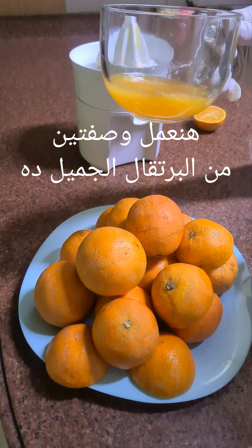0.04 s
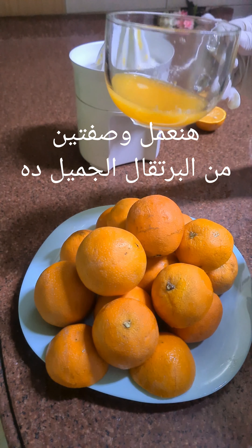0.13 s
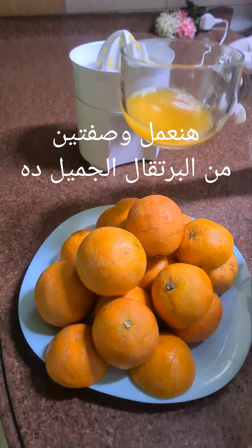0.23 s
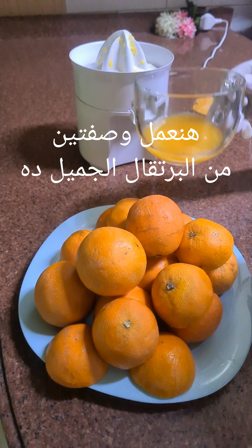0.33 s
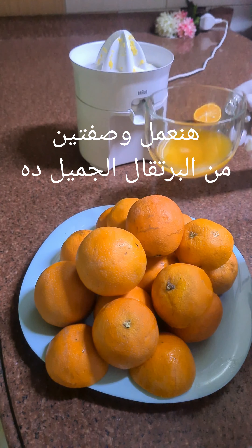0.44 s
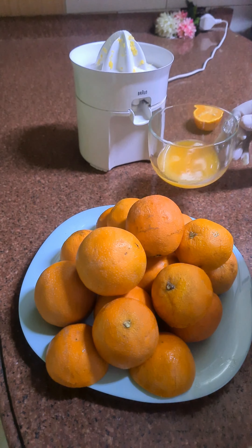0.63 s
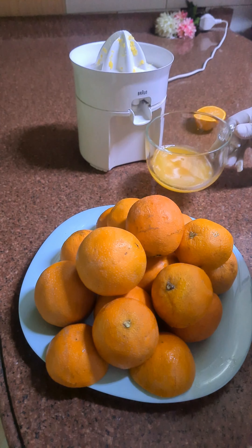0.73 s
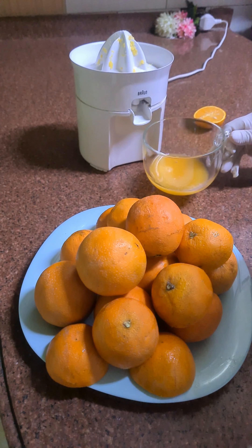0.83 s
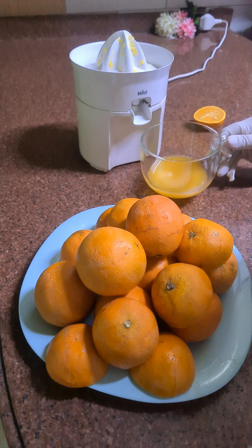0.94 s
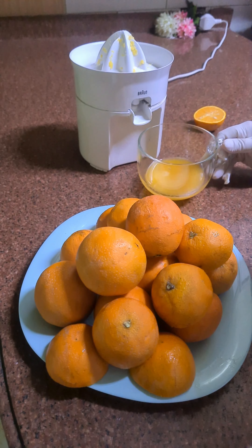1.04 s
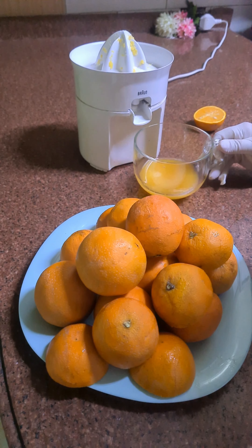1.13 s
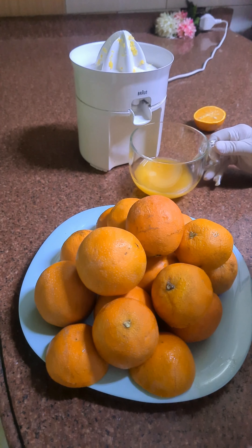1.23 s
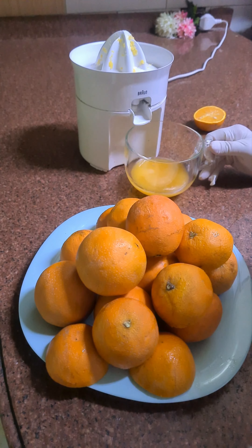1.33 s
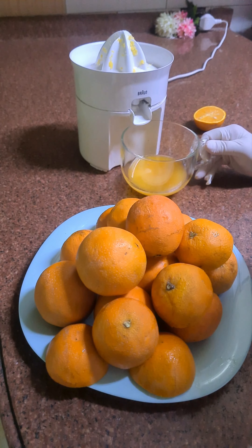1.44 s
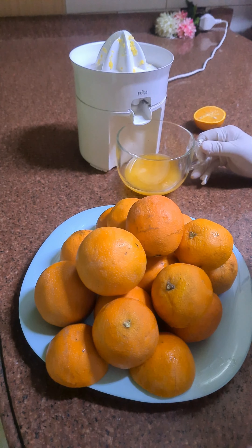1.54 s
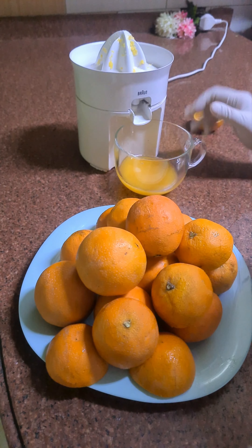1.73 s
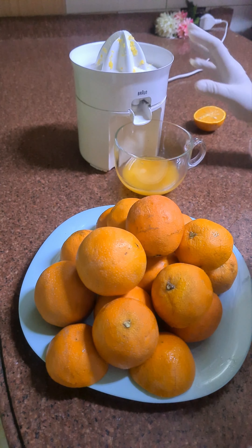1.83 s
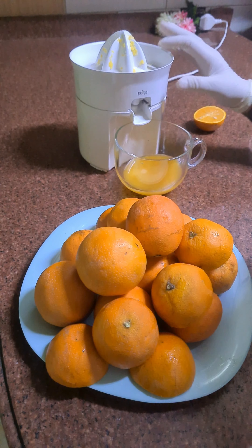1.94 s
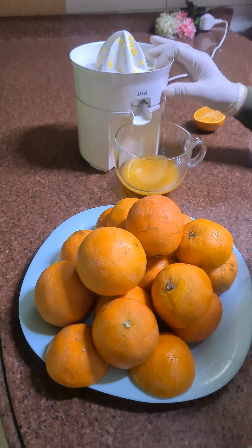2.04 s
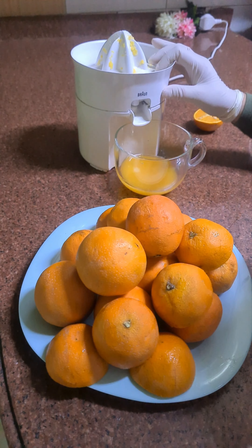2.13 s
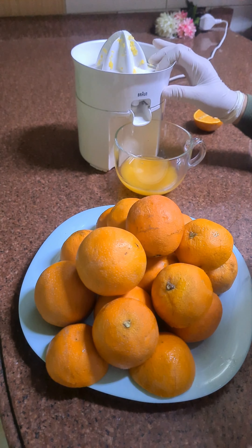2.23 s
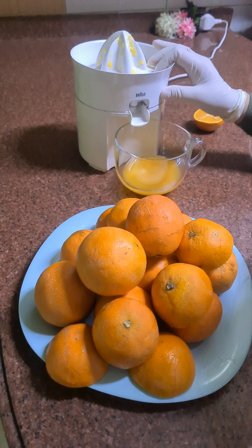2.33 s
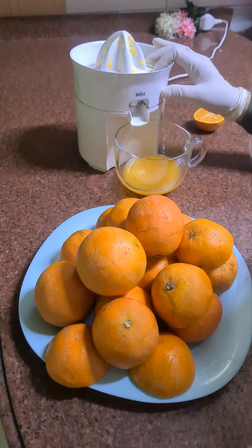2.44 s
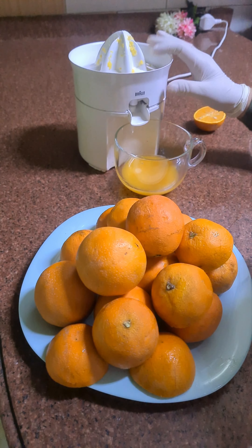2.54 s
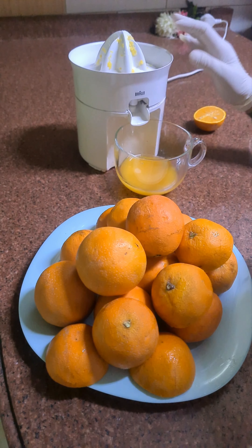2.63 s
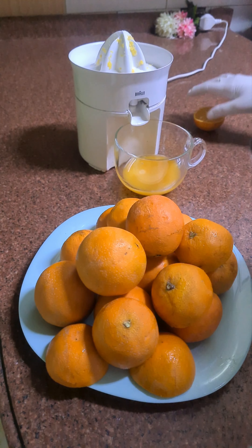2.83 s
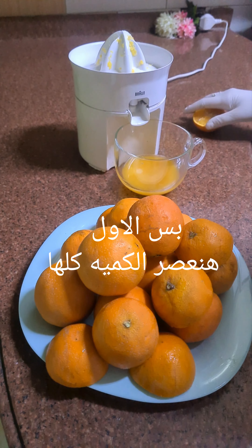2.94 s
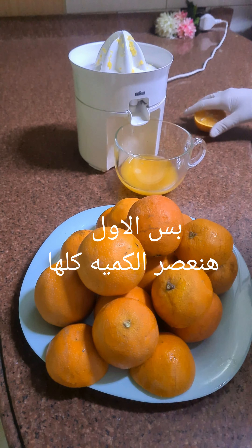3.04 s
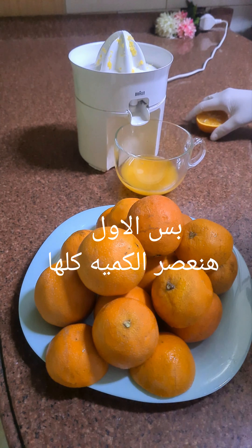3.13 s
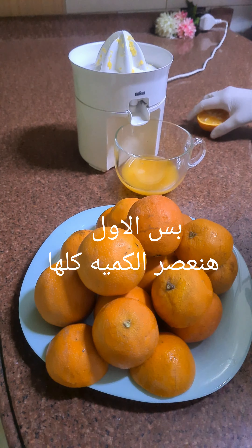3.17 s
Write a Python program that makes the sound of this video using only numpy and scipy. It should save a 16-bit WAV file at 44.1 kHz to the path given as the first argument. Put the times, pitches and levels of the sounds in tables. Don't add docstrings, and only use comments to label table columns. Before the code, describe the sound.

Over low room hum, a heavy glass cup hits the stone counter twice, wobbles and is pushed with a short gritty scrape. A quiet stretch has sparse glove rubs, faint ticks and a couple of hollow plastic knocks. In the last two seconds a small geared motor spins up fast to a steady buzzing whir, then drops slightly and throbs under load, with fine juice crackle. Near stereo phone, short bright room reflections.

```python
import sys
import numpy as np
from scipy import signal
from scipy.fft import rfft, irfft
from scipy.io import wavfile
from scipy.ndimage import uniform_filter1d

SR = 44100
rng = np.random.default_rng(int(sys.argv[2]) if len(sys.argv) > 2 else 0)


def gain_from_db(level_db):
    decades = np.asarray(level_db, float) / 20
    return 10 ** decades


def transcribe(u):
    v = np.clip(np.atleast_2d(u).T, -1, 1)
    q = np.round(v * 32767).astype(np.int16)
    wavfile.write(sys.argv[1], SR, q)


N = 329427
T = np.arange(N) / SR
HZ = np.maximum(np.fft.rfftfreq(N, 1 / SR), 1)

# time_s, mesh_rate_hz
MOTOR_SPEED = [
    (5.27, 255),
    (5.33, 290),
    (5.372, 334),
    (5.46, 335),
    (6.0, 324.8),
    (6.6, 317.5),
    (7.2, 317.2),
    (7.47, 318.2),
]
LINE_ORDERS = [(1, 0), (2, -2), (2, -1), (2, 1), (3, -1), (3, 0), (4, -1), (4, 1), (5, 0), (5, 1), (6, -1),
               (6, 1), (7, 0), (8, 0), (9, 0), (9, 1), (11, 0), (2, 0), (4, 0), (6, 0)]
# free_level_db, loaded_level_db, left_minus_right_db
SIDE_LINES = [(-81, -51.5, 4), (-58, -55, 0), (-54.5, -56, 4), (-51.5, -56.5, 7), (-50.5, -60, -4.5),
              (-43.5, -38, 1.5), (-46.5, -37.5, 5), (-49.5, -43, 4), (-45.5, -47.5, 4), (-46, -56, -6),
              (-45, -74, 4), (-53, -62, -26), (-48, -60, 13.5), (-75, -48, -5), (-51.5, -45, -12),
              (-73.5, -49.5, 7), (-59, -55, -11.5)]
# level_db, mode_hz, width_hz, swell_db, left_minus_right_db
MAIN_LINES = [(-40, 640, 57, 0.5, 2), (-39.5, 1302, 42.5, 11, 0), (-55.5, 1995, 39, 29, -4.5)]
UNSETTLED = [-6.5, -0.5, -15]
PORT_LAG_RAD = [0, -4, 1, 2, 2, 0.9, 1.5, -5.5, 0.5, 4, 1.6, 2]
# mode_hz, width_hz, level_db
HOUSING_MODES = [(650, 16, -3), (927, 87, -3), (1335, 7.2, -7.5), (1690, 18, 3), (1847, 11, -26),
                 (2340, 78, -8), (2720, 21, -22), (2880, 170, -3.5), (3400, 210, -14), (4200, 74, -18),
                 (5430, 67, -12), (6260, 21, -15)]
# frequency_hz, density_db (per Hz)
RATTLE_SPECTRUM = [(59, -63.5), (100, -20), (224, -16), (322, -6.5), (570, -10), (634, -8), (801, -15),
                   (970, -7), (1060, -9.5), (1250, 3.5), (1480, -9), (2860, -11.5), (6560, -19),
                   (7940, -36.5), (16000, -43)]
# start_s, level_db, weight_db (extra thud), hardness_db (extra treble)
BOWL_BLOWS = [
    (1.005, -10, -1.5, -1.5),
    (1.046, -13, -13.5, -2.5),
    (1.137, -22, -0.5, -6.5),
    (1.165, -29.5, 9, -12),
    (1.201, -29.5, 5.5, 0),
    (1.266, -27, 5.5, -12),
    (1.284, -25.5, -13, -19),
    (1.296, -25.5, 4.5, -3.5),
    (1.43, -25.5, 3, 0.5),
    (1.517, -36, 0, -10),
]
# start_s, level_db, weight_db, hardness_db
JUICER_BLOWS = [
    (2.525, -59, 2, -8),
    (4.19, -25.5, 1.5, -1),
    (4.416, -55, 0, 0),
    (4.519, -50, 2.5, 4.5),
    (4.815, -53.5, 1, -14),
    (5.294, -43.5, 1, -10.5),
    (6.449, -31, 0, -4),
]
# start_s, level_db, weight_db, hardness_db
SPOUT_BLOWS = [
    (2.355, -37.5, -1, -3),
    (4.872, -46, -5, -12),
]
# start_s, level_db, crispness_db (extra top)
TICK_BLOWS = [(1.541, -69, -7), (1.644, -59, -23), (1.775, -56, -1), (1.985, -45.5, -4), (3.657, -63, -2),
              (3.68, -57.5, 0), (4.509, -45.5, 3.5), (4.693, -55, -12.5), (4.757, -66.5, 14),
              (5.249, -54, 0), (7.154, -51.5, 15.5), (7.219, -34.5, -10), (7.347, -46.5, 7.5),
              (7.464, -43, -4)]
# low_hz, high_hz
BLOW_BANDS = [(220, 800), (800, 2900), (2900, 7300), (8700, 15800)]
BOWL_BANDS = [-11, -1.5, -31, -43.5]
JUICER_BANDS = [-4, -1, -3.5, -26.5]
SPOUT_BANDS = [1, -1, -12, -46]
TICK_BANDS = [-22, -12, 2.5, -10]
BLOW_TRAITS = [
    [1, 0, 0, 0],
    [0, 0, 1, 1],
]
CRISP_TRAIT = [
    [0, 0, 0, 1],
]
# mode_hz, level_db, t60_s
BOWL_MODES = [(760, -5, .12), (931, -3, .12), (1050, -6, .12), (1184, 1, .25), (1420, -6, .1),
              (1760, 5, .05), (2300, 0, .08), (4613, -4, .08), (6654, 8, .3), (7058, 2, .25),
              (9050, 31, .3), (12600, 8, .2)]
JUICER_MODES = [(565, 2, .14), (700, -5, .12), (829, -2, .19), (1233, -1, .24), (1480, -9, .1),
                (2213, -6, .1), (2650, -3, .12), (3050, -2, .12), (3445, -4, .12)]
SPOUT_MODES = [(330, -1, .1), (548, 0, .15), (1330, -1, .22), (1793, -5, .06), (2670, -2, .24),
               (2826, -5, .16), (4705, 2, .1)]
# frequency_hz, level_db
BLOW_TONE = [(200, -3.5), (600, 0), (1300, 0), (2600, -8.5), (3600, -12), (7000, -29.5), (7700, -40),
             (10000, -34.5), (12000, -26), (16000, -33.5)]
# time_s, level_db
DRAG = [
    (0.98, -82),
    (1.05, -73),
    (1.164, -42.5),
    (1.178, -56),
    (1.338, -50),
    (1.416, -70),
    (1.6, -71),
]
# start_s, length_s, hiss_db, rub_db
STROKES = [(1.645, .01, -72, -72), (1.768, 0.025, -64.5, -87.5), (1.992, 0.0039, -64, -66.5),
           (2.028, .14, -82, -62), (2.61, 0.04, -78, -73.5), (2.707, .015, -67, -81),
           (2.817, 0.085, -72.5, -71), (2.954, 0.25, -70.5, -70.5), (3.32, 0.055, -73, -75),
           (3.402, 0.1, -67, -78), (3.65, .03, -71, -81.5), (3.848, 0.16, -78.5, -80.5),
           (4.588, 0.018, -71.5, -70), (4.695, 0.048, -69, -66.5), (4.805, 0.075, -68, -62),
           (4.958, 0.39, -73, -70.5)]
# frequency_hz, density_db (per Hz)
RUBBER_SPECTRUM = [(470, -30), (800, -37), (831, -5.5), (1740, -8.5), (2910, -3), (5380, -4), (7000, -5.5),
                   (7930, -25.5), (11700, -12), (16000, -25.5)]
# start_s, level_db, pitch_hz, t60_s
GLASS_RINGS = [
    (.15, -82, 4800, 2.5),
    (1.638, -64, 4750, .12),
    (1.645, -68, 6000, .1),
    (2.165, -68, 1900, .06),
    (3.805, -68, 2300, .08),
    (4.56, -67, 3300, 1.1),
]
# frequency_hz, t60_s
KITCHEN_DECAY = [(150, .45), (600, .36), (2000, .36), (6000, .28), (14000, .15)]
# frequency_hz, density_db (per Hz)
RUMBLE_SPECTRUM = [(18, -30.5), (30, -2), (54, -5), (113, -16.5), (144, -7.5), (167, -16), (292, -19),
                   (412, -25), (509, -27), (918, -42.5), (1500, -38.5), (1950, -78), (3300, -120)]
HISS_SPECTRUM = [(880, -47.5), (1500, -7.5), (1810, -6), (2320, -15.5), (2860, -5.5), (3150, -5),
                 (4290, -9), (4920, -12), (5120, -8.5), (6960, -17.5), (7610, -38.5), (11400, -14.5),
                 (16000, -19)]
# centre_hz, width_hz, level_db
HUM_BANDS = [(51.7, 8, -65.5), (98, 7.9, -70), (139.2, 7.1, -67.5), (3150, 150, -86), (4800, 40, -91.5),
             (5560, 350, -80.5)]

FREE_HZ, LOADED_HZ, RIPPLE_HZ = 333, 318, 100
CONTACT_S, SWITCH_S, SETTLED_S, RISE_DB_PER_S = 5.288, 5.35, 5.48, 233
RATTLE_FREE_DB, RATTLE_LOADED_DB = -43.5, -39.5
CONE_RATIO, CONE_DIP_S = 59.5, 6.61


def level(x, db):
    return x * gain_from_db(db) / np.sqrt(np.mean(x ** 2))


def on_log(table, hz):
    table_hz, value = np.array(table).T
    return np.interp(np.log(hz), np.log(table_hz), value)


def walk(rate):
    hold = int(SR / rate)
    steps = np.repeat(rng.standard_normal(N // hold + 1), hold)
    return 1.43 * uniform_filter1d(uniform_filter1d(steps, hold), hold)[:N]


def ports(gain, split_hz=750):
    mid, side = rfft(rng.standard_normal((2, N))) * gain
    side = side * np.clip((HZ / split_hz) ** 1.3, .11, 1)
    return irfft(np.array([mid + side, mid - side]), N)


def room(x, wet_db):
    t, tail = T[:SR // 2], 0
    noise = ports(1)[:, :len(t)]
    for hz in 125 * 2. ** np.arange(7):
        high_hz = min(hz * 2 ** .5 * (1 + hz // 8000), 20000)
        sos = signal.butter(2, [hz / 2 ** .5, high_hz], "band", fs=SR, output="sos")
        tail = tail + signal.sosfilt(sos, noise) * 1000 ** (-t / on_log(KITCHEN_DECAY, hz))
    tail = tail * (1 - np.exp(-t / 0.00053))
    tail = tail / np.sqrt(np.sum(tail ** 2) / 2)
    return gain_from_db(wet_db) * signal.fftconvolve(x[None], tail, axes=1)[:, :N]


def motor():
    hz = np.interp(T, *np.transpose(MOTOR_SPEED))
    turn = 2 * np.pi * np.cumsum(hz + 0.792 * walk(25)) / SR
    load = np.clip((FREE_HZ - hz) / (FREE_HZ - LOADED_HZ), 0, 1) * (T > 5.5)
    start_db = -RISE_DB_PER_S * np.maximum(SWITCH_S - T, 0) - 4000 * np.maximum(CONTACT_S - T, 0)
    rattle_db = RATTLE_FREE_DB + load * (RATTLE_LOADED_DB - RATTLE_FREE_DB) + start_db
    spin_db = np.minimum(rattle_db + 47.0, 0) - 14 * np.clip((5.48 - T) / 0.58, 0, 1)
    cone = (turn - turn[int(CONE_DIP_S * SR)]) / CONE_RATIO
    throb_db = -7.5 * load * ((1 + np.cos(cone)) / 2) ** 6
    whine = gear_whine(hz, turn, load, start_db, spin_db, cone, throb_db)
    return whine + loose_lid(load, throb_db + spin_db) + housing_rattle(turn, rattle_db)


def gear_whine(hz, turn, load, start_db, spin_db, cone, throb_db):
    levels = [(free + load * (heavy - free) + spin_db, pan) for free, heavy, pan in SIDE_LINES]
    unsettled = np.clip((SETTLED_S - T) / .06, 0, 1)
    main_orders = LINE_ORDERS[len(SIDE_LINES):]
    for (k, _), (db, mode_hz, width, swell_db, pan), off_db in zip(main_orders, MAIN_LINES, UNSETTLED):
        swell = swell_db / (1 + (2 * (k * hz - mode_hz) / width) ** 2)
        levels.append((db + start_db + off_db * unsettled + swell, pan))
    out = np.zeros((2, N))
    for (k, m), (db, pan_db) in zip(LINE_ORDERS, levels):
        angle = k * turn + 2 * np.pi * m * RIPPLE_HZ * T + 0.11 * k * walk(35) + 6 * rng.random()
        lag = PORT_LAG_RAD[k] * (.4 if m else 1) * (0.73 + 0.29 * load) + 0.034 * k * walk(3)
        waver_db = (2.4 if m else 1.3) * walk(25)
        gain = 2 ** .5 * gain_from_db(db + waver_db + (throb_db if k > 2 else 0))
        if (k, m) == LINE_ORDERS[-1]:
            gain = gain * gain_from_db(-23 * ((1 + np.cos(cone + 2.7)) / 2) ** 2)
        left = gain_from_db(pan_db / 2) * np.sin(angle)
        right = gain_from_db(-pan_db / 2) * np.sin(angle - lag)
        out += gain * np.array([left, right])
    return out


def housing_rattle(turn, rattle_db):
    modes = sum(gain_from_db(db + 8) / np.hypot(1, np.abs(2 * (HZ - hz) / width) ** 1.2)
                for hz, width, db in HOUSING_MODES)
    colour = gain_from_db(on_log(RATTLE_SPECTRUM, HZ)) * (1 + modes)
    beat = 1 + 0.22 * np.cos(turn) + 0.093 * np.cos(2 * np.pi * RIPPLE_HZ * T)
    return level(ports(colour), 8.55) * beat * gain_from_db(rattle_db + 0.9 * walk(30))


def loose_lid(load, gain_db):
    ring = level(ports(1 / (1 + ((HZ - 1283) / 12) ** 2), split_hz=1100), -37.5)
    return ring * load ** 1.1 * gain_from_db(gain_db)


def spatter():
    chance = rng.random((2, N))
    grains = (chance[0] < 60 / SR) * gain_from_db(-3.2 * np.log(chance[1] + 1e-9))
    puff = signal.lfilter([1], [1, -np.exp(-1 / (.004 * SR))], grains)
    puff = puff * np.clip((T - 5.7) / 0.53, 0, 1)
    hiss = level(ports(1 / (1 + ((HZ - 12500) / 1800) ** 4)), 0)
    return level(hiss * puff, -75)


def knocks(events, colour_db, traits, modes, ring_db, body_db, body_t60, tilt, pan_db, wet_db):
    t, dry = T[:SR // 2], np.zeros(N + SR)
    colour = gain_from_db(tilt * on_log(BLOW_TONE, np.fft.rfftfreq(len(t), 1 / SR) + 1))
    for s, blow_db, *trait_db in events:
        body = gain_from_db(body_db) * rng.standard_normal(len(t))
        rings = np.zeros(len(t))
        rings[0] = -1
        for hz, db, t60 in modes:
            luck = rng.standard_normal(3)
            beat = 1 + 0.69 * np.cos(2 * np.pi * (30 + 10 * luck[2]) * t)
            tone = np.sin(2 * np.pi * hz * (1 + .003 * luck[1]) * t)
            rings += gain_from_db(db + ring_db + 2 * luck[0]) * beat * tone * 1000 ** (-t / t60)
        bands_db = blow_db + np.array(colour_db) + np.dot(trait_db, traits)
        start = int(s * SR)
        for edges, db in zip(BLOW_BANDS, bands_db):
            height = edges[1] / 2900
            decay = 1000 ** (-t / body_t60 * height ** 0.35)
            sound = irfft(rfft(rings + body * height ** .9 * decay) * colour)
            part = signal.sosfilt(signal.butter(5, edges, "band", fs=SR, output="sos"), sound)
            part = part * gain_from_db(db) / np.sqrt(np.mean(part[:300] ** 2))
            dry[start:start + len(t)] += part * (t < .49)
    dry = dry[:N]
    late = np.roll(dry, 7)
    return np.array([dry * gain_from_db(pan_db / 2), late * gain_from_db(-pan_db / 2)]) + room(dry, wet_db)


def slide():
    drag_s, drag_db = np.transpose(DRAG)
    drag = gain_from_db(np.interp(T, drag_s, drag_db, left=-140, right=-140))
    grit = rng.standard_normal(N) * gain_from_db(2.4 * walk(130)) * drag
    grit = gain_from_db(-6) * signal.sosfilt(signal.butter(3, [450, 2300], "band", fs=SR, output="sos"), grit)
    return grit + room(grit, 1.5)


def glove():
    hiss, rub = np.zeros((2, N))
    for s, length, hiss_db, rub_db in STROKES:
        grip_db = -507 * np.maximum(s - T, 0)
        slip_db = -159 * np.maximum(T - s - length, 0)
        hiss += gain_from_db(hiss_db + grip_db + slip_db)
        rub += gain_from_db(rub_db + grip_db + slip_db)
    rustle = level(ports(gain_from_db(on_log(RUBBER_SPECTRUM, HZ))), 0.88)
    drag = level(ports(1 / (1 + ((HZ - 560) / 300) ** 3 * np.sign(HZ - 560))), -2.0)
    return rustle * hiss * gain_from_db(2.6 * walk(60)) + drag * rub * gain_from_db(4.6 * walk(46))


def glints():
    ring = np.zeros(N)
    for s, db, hz, t60 in GLASS_RINGS:
        attack = np.clip((T - s) / 0.002, 0, 1)
        ring += gain_from_db(db) * attack * np.sin(2 * np.pi * hz * T) * 1000 ** (-np.abs(T - s) / t60)
    return ring + room(ring, -5)


def air():
    rumble = level(ports(gain_from_db(on_log(RUMBLE_SPECTRUM, HZ)) * (HZ < 1600)), -57.5)
    out = rumble * gain_from_db(2.1 * walk(9))
    out = out + level(ports(gain_from_db(on_log(HISS_SPECTRUM, HZ)) * (HZ > 1200)), -72.5)
    for hz, width, db in HUM_BANDS:
        out = out + level(ports(1 / (1 + (2 * (HZ - hz) / width) ** 2)), db)
    return out


def scene():
    bowl = knocks(BOWL_BLOWS, BOWL_BANDS, BLOW_TRAITS, BOWL_MODES, ring_db=-46, body_db=-39,
                  body_t60=.33, tilt=.7, pan_db=-.4, wet_db=-9)
    juicer = knocks(JUICER_BLOWS, JUICER_BANDS, BLOW_TRAITS, JUICER_MODES, ring_db=-31.5, body_db=-21,
                    body_t60=.24, tilt=1.0, pan_db=3.2, wet_db=1.5)
    spout = knocks(SPOUT_BLOWS, SPOUT_BANDS, BLOW_TRAITS, SPOUT_MODES, ring_db=-31, body_db=-24,
                   body_t60=0.173, tilt=0.9, pan_db=1.0, wet_db=-1)
    ticks = knocks(TICK_BLOWS, TICK_BANDS, CRISP_TRAIT, [], ring_db=0, body_db=-15.5,
                   body_t60=0.02, tilt=0.68, pan_db=0.2, wet_db=-8.5)
    blows = gain_from_db(-3.0) * bowl + gain_from_db(-2.0) * (juicer + spout) + gain_from_db(-5.0) * ticks
    return motor() + spatter() + blows + slide() + glove() + glints() + air()


def low_pass(x):
    return signal.sosfilt(signal.butter(12, 16180, fs=SR, output="sos"), x)


def record(dry):
    mix = signal.sosfilt(signal.butter(6, 40, "high", fs=SR, output="sos"), dry)
    return low_pass(mix)


dry = scene()
out = record(dry)
transcribe(out)
```